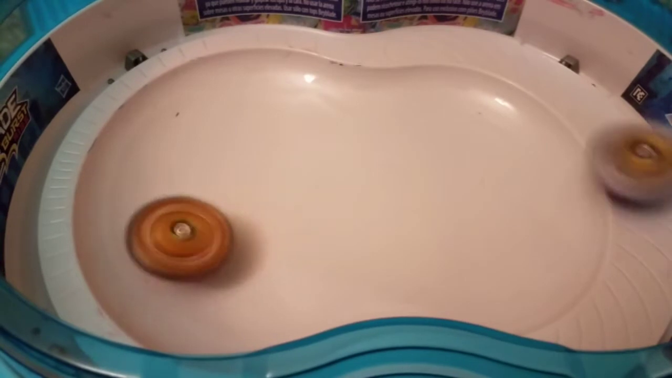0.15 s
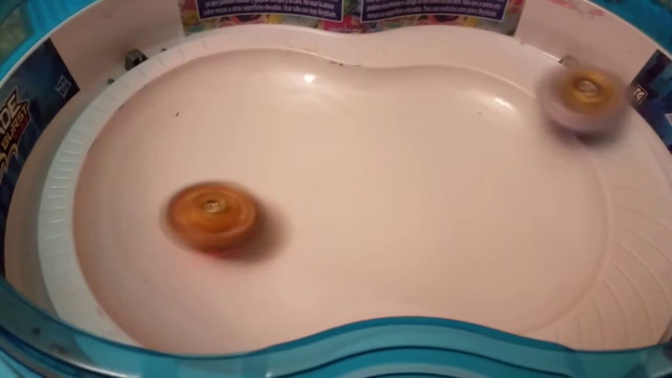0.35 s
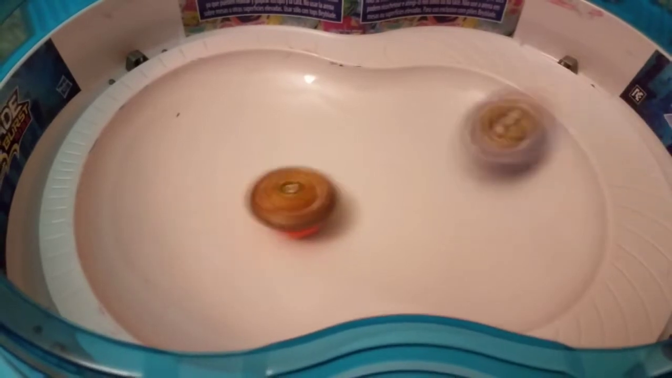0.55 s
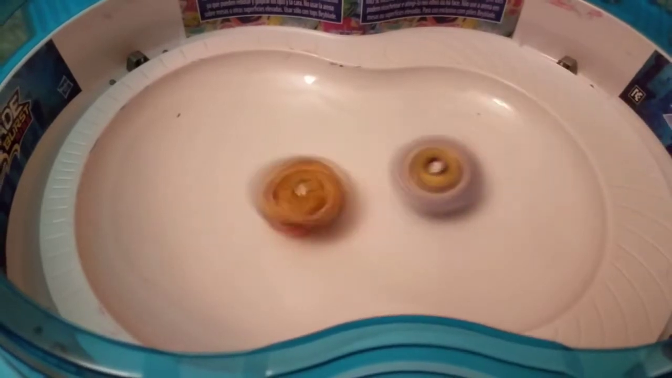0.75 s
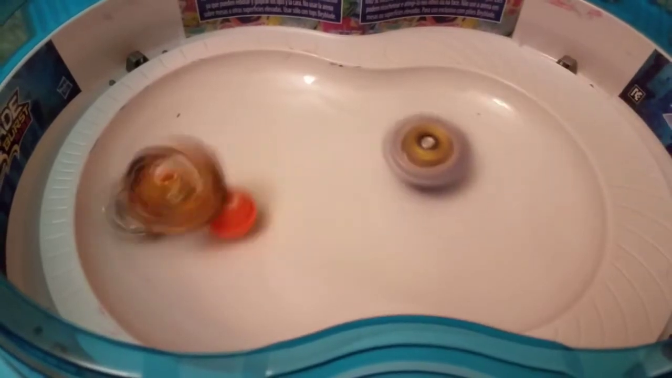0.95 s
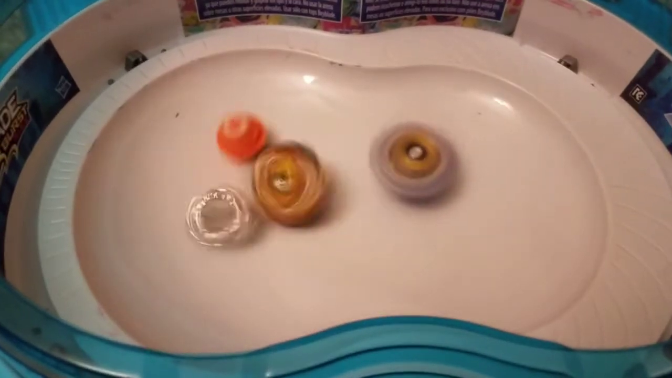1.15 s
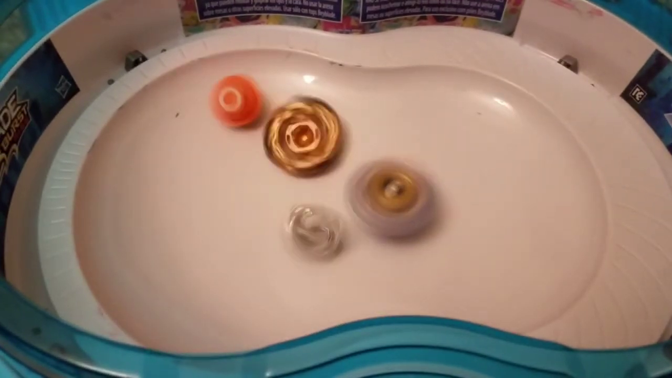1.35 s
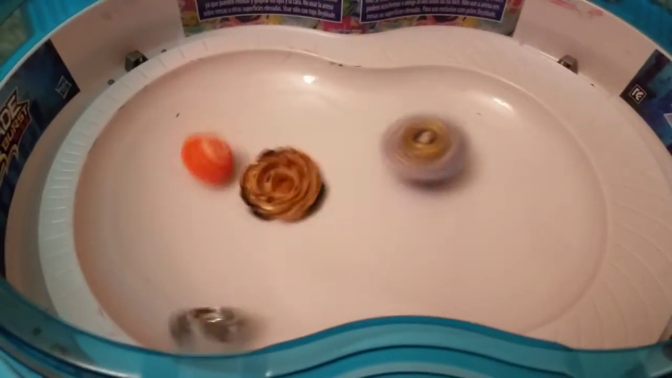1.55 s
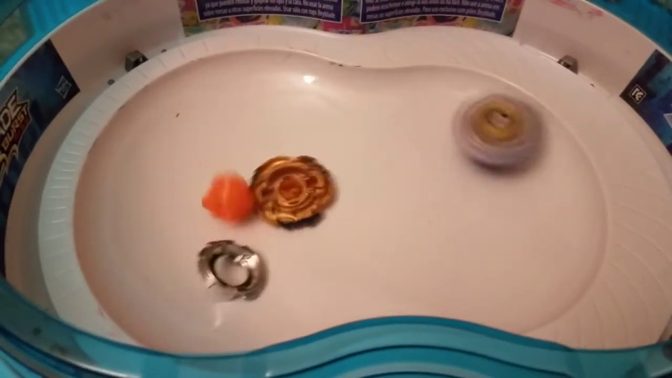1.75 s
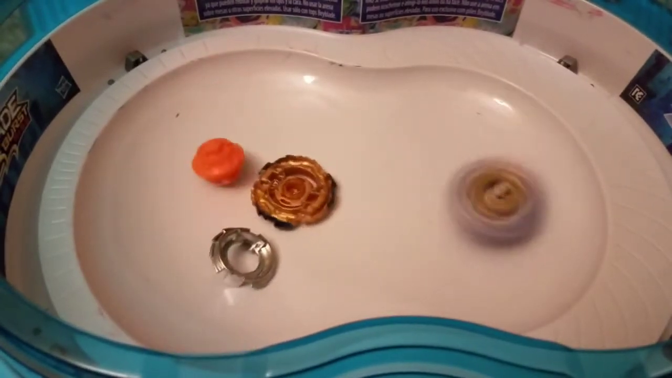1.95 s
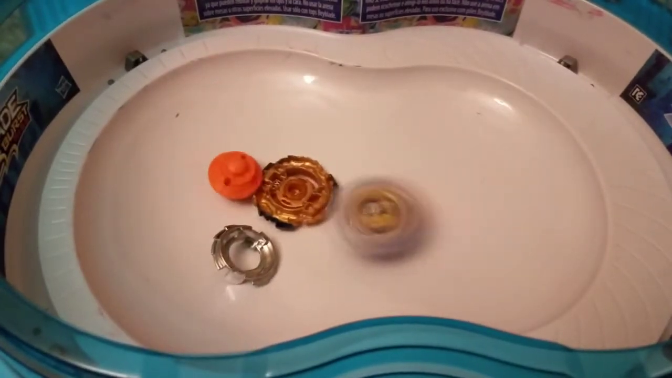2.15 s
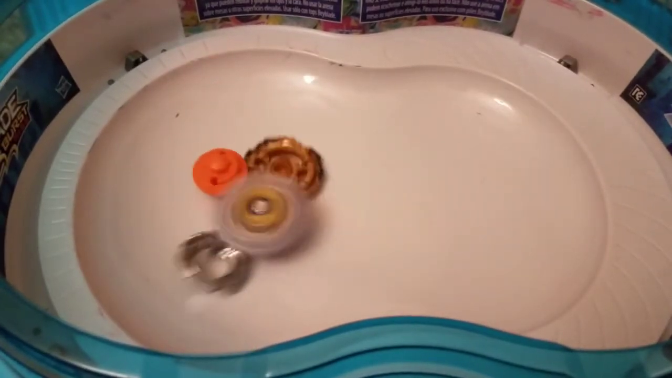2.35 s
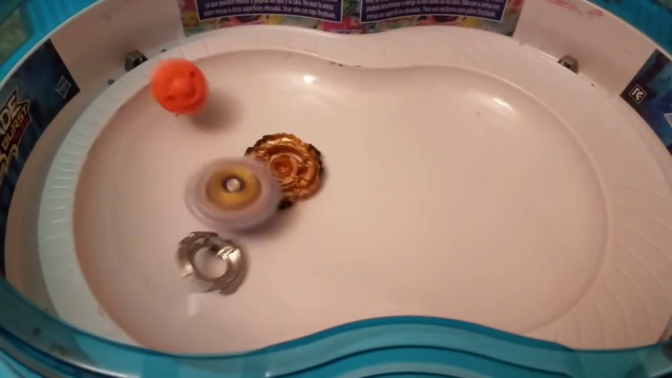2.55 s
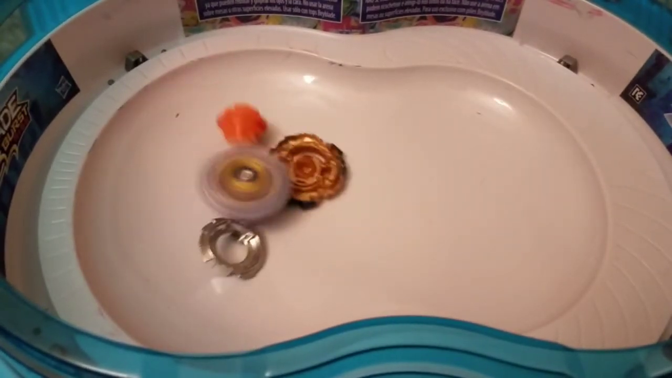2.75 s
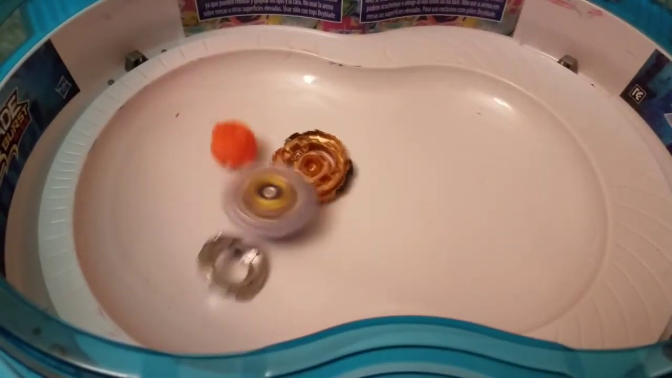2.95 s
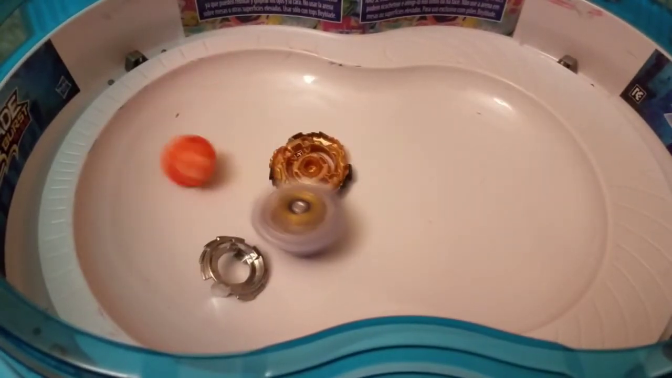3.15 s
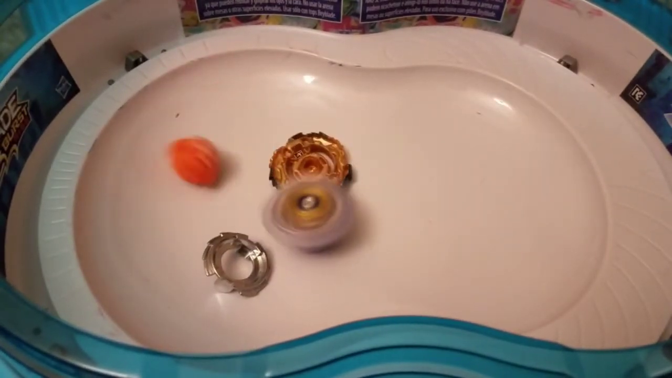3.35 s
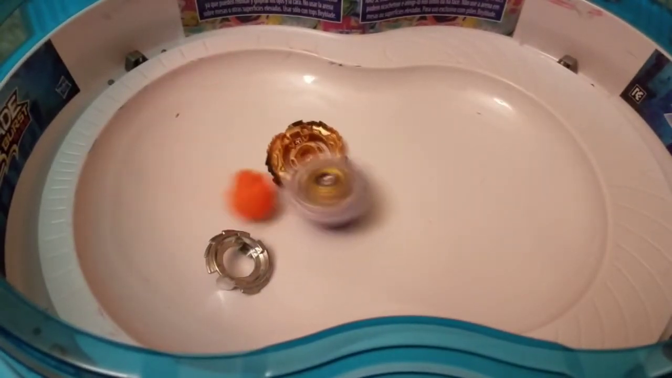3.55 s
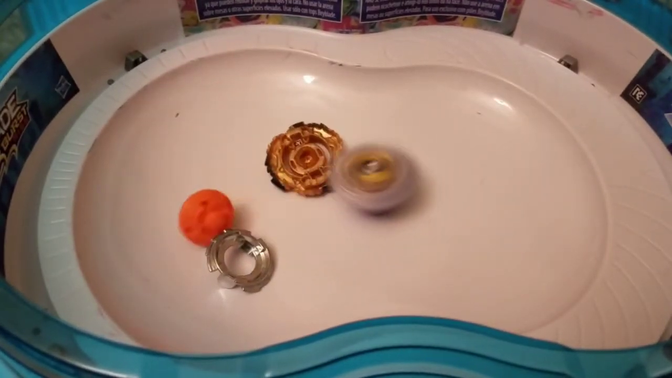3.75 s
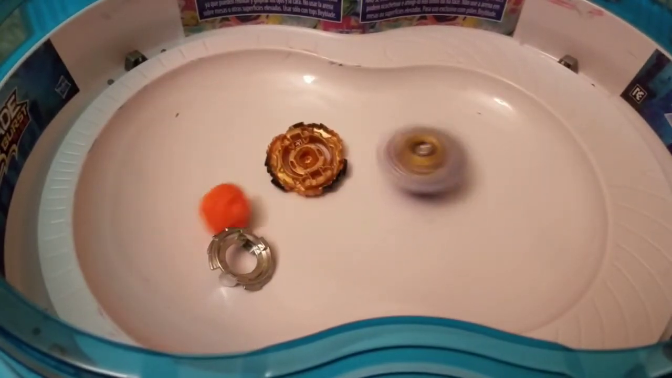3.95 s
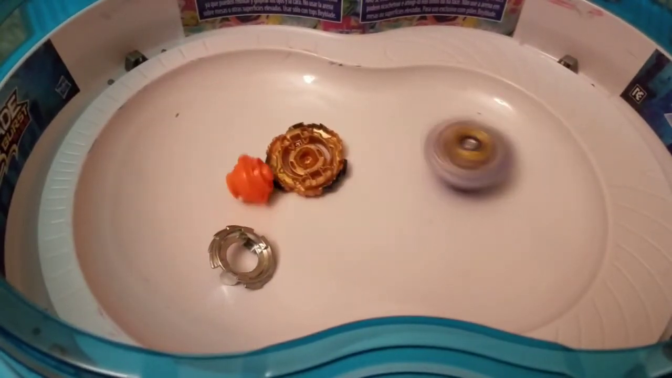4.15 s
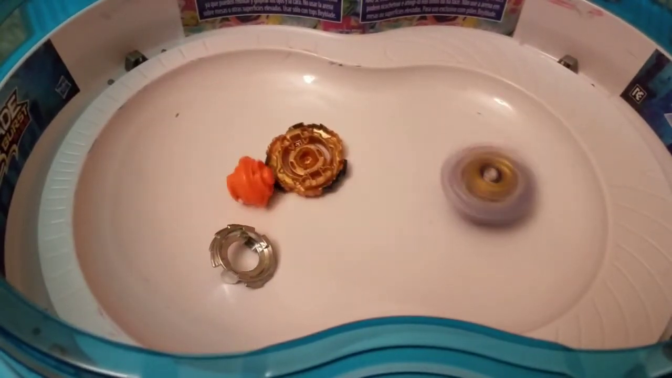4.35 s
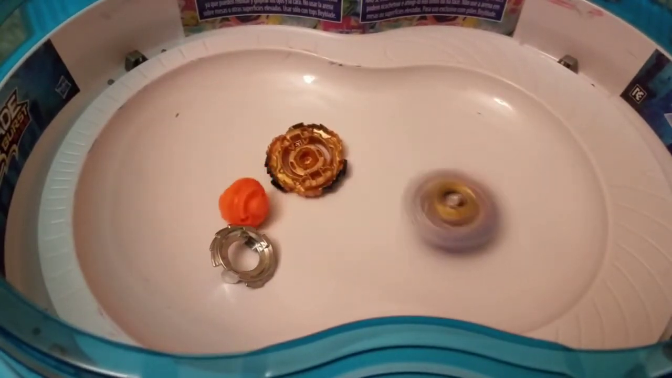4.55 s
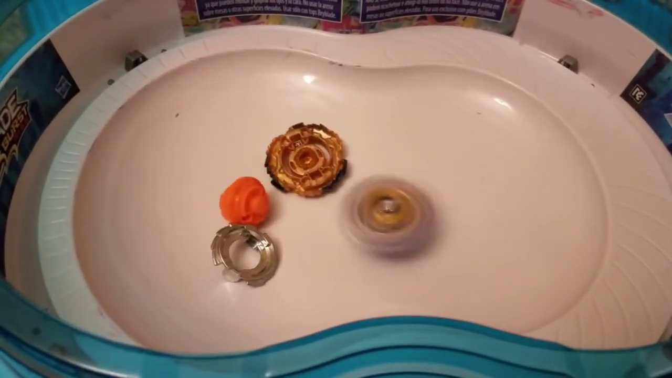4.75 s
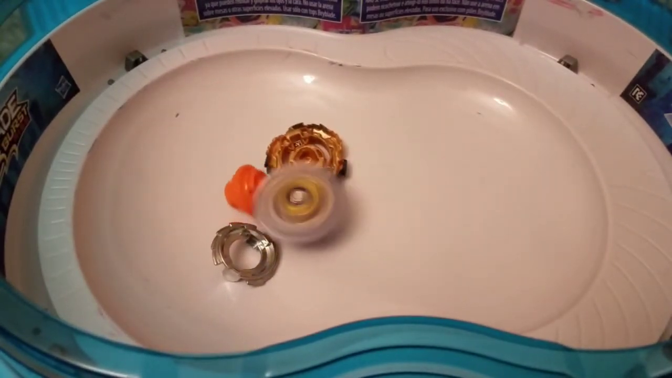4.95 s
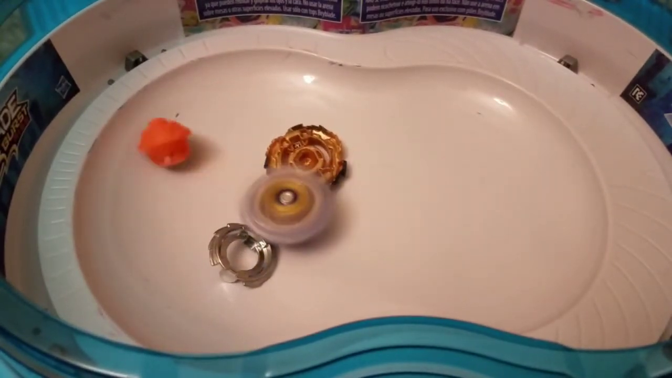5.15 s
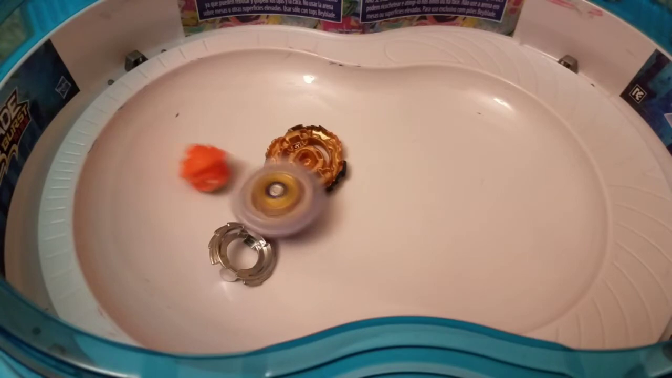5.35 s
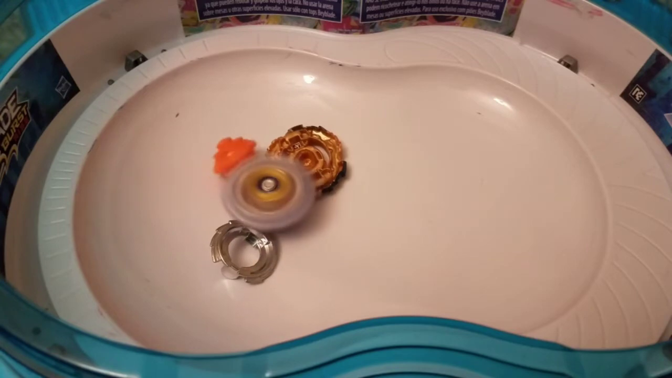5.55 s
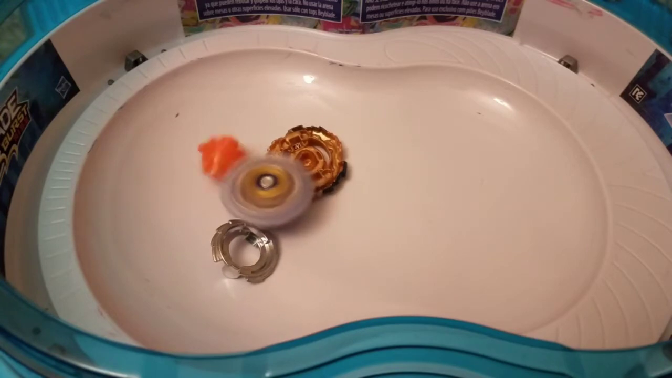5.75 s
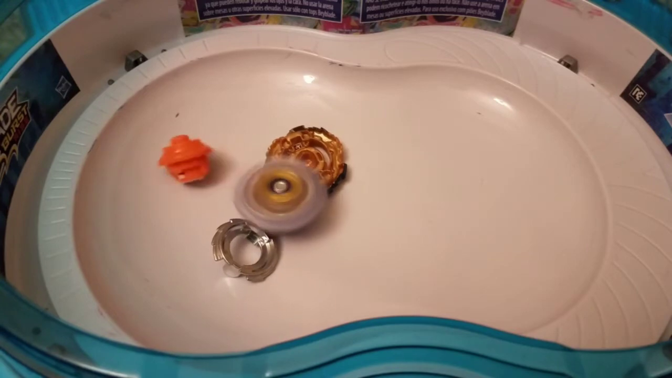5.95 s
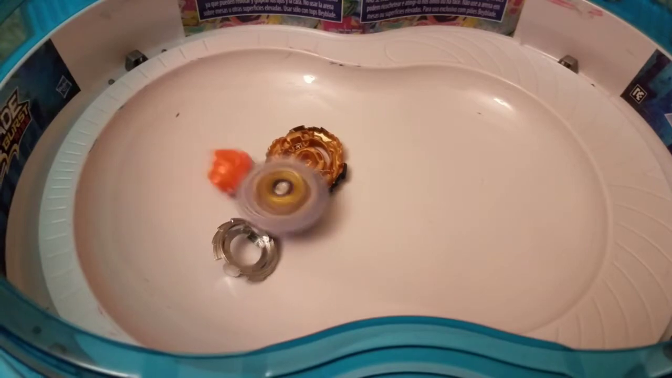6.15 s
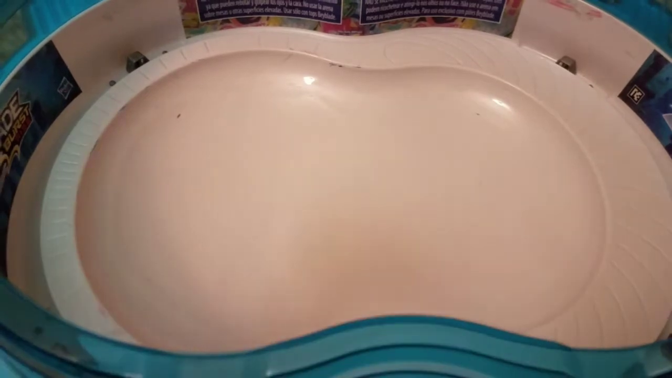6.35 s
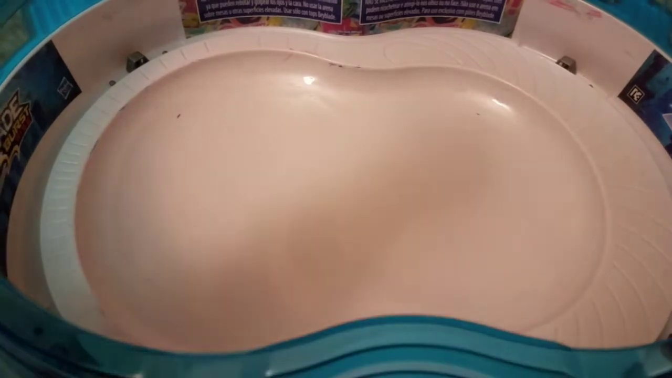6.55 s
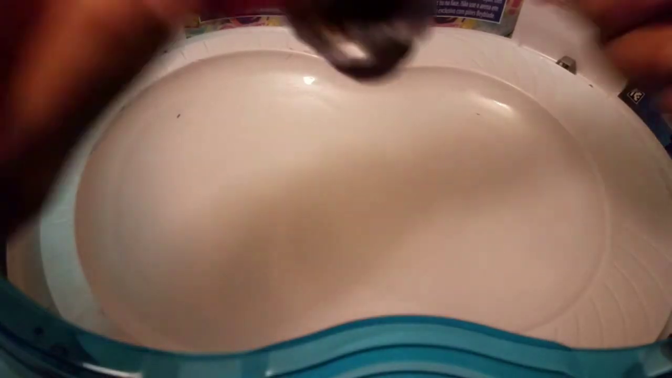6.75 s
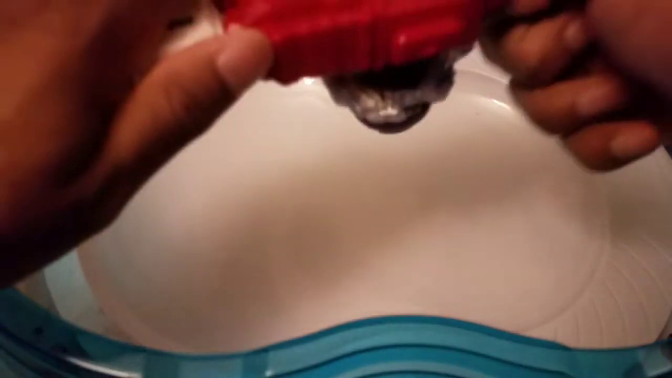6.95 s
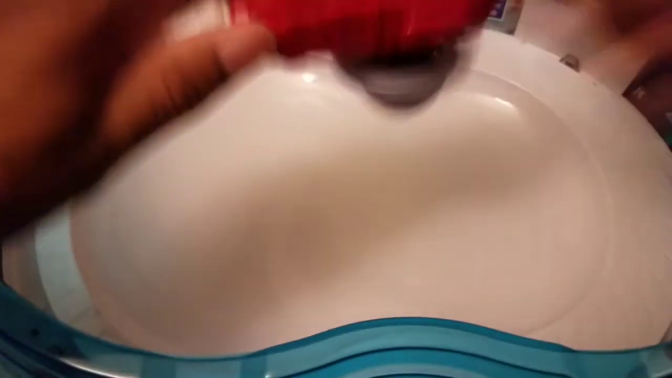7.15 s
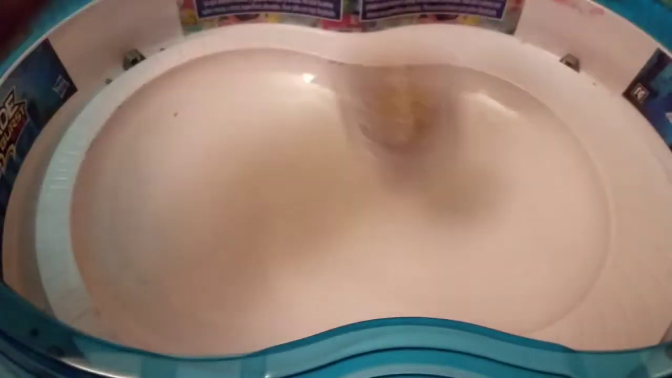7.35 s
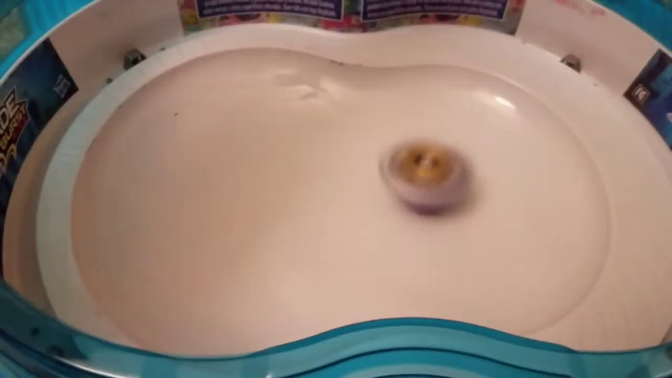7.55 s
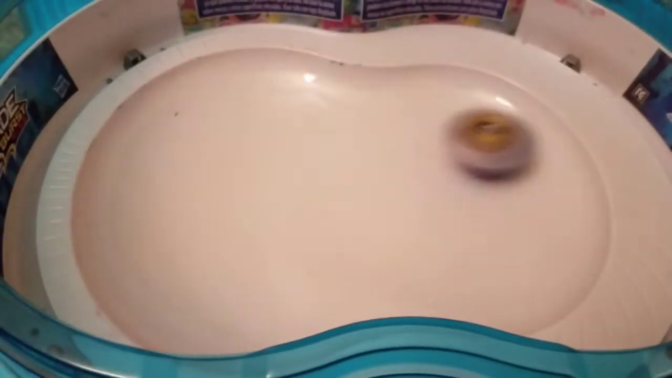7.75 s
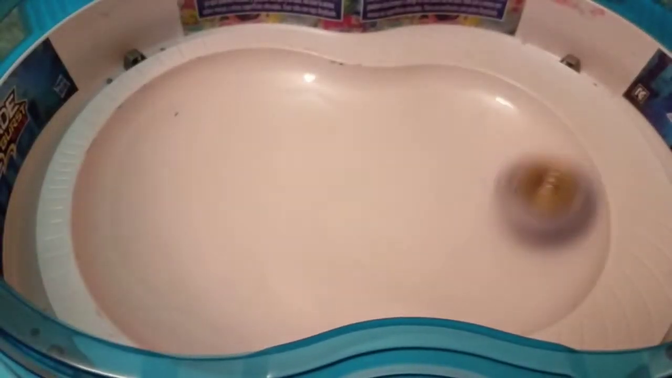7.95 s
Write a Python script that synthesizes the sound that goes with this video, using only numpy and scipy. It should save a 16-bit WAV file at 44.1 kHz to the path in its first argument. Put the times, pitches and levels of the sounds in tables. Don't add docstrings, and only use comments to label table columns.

```python
import sys
import numpy as np
from scipy import signal
from scipy.fft import rfft, irfft, next_fast_len
from scipy.io import wavfile
from scipy.ndimage import uniform_filter1d, map_coordinates

SR = 44100
rng = np.random.default_rng(int(sys.argv[2]) if len(sys.argv) > 2 else 0)


def dump_mix(stems):
    frames = np.atleast_2d(stems).T
    limited = np.clip(frames, -1, 1)
    pcm = np.round(limited * 32767).astype(np.int16)
    wavfile.write(sys.argv[1], SR, pcm)


def to_linear_factor(level_db):
    exponent = np.asarray(level_db, float) / 20
    return 10 ** exponent


N = 357210
CUT, FADE = 6.07, .1

# crest in seconds, peak in dB, pitch of the spot in Hz.
TUMBLE_BLOWS = [(.2442, -24.5, 650), (.2627, -19, 640), (.3096, -12, 440), (.3392, -16, 410),
                (.6937, -5, 470), (.7017, -6.5, 430), (.7134, -9, 483), (.764, -6.5, 470),
                (.832, -9.5, 438), (.911, -3, 438), (.9478, -18, 410), (1.0689, -5, 500),
                (1.0874, -9.5, 600), (1.1386, -8.5, 493), (1.179, -9.5, 480), (1.1986, -14, 450),
                (1.2417, -9, 570), (1.2687, -12.5, 437), (1.3301, -7.5, 463), (1.3424, -12, 560),
                (1.4067, -9, 430), (1.4268, -11.5, 456), (1.5831, -18, 400), (1.6301, -13.5, 393),
                (7.1975, -14.5, 403), (7.2003, -10.5, 470), (7.2095, -24, 380), (7.217, -13.5, 380),
                (7.3455, -31, 415), (7.3602, -23.5, 545)]
# crest in
# seconds, peak in dB.
ATTACK_BLOWS = [(2.0941, -22), (2.1075, -9), (2.137, -19.5), (2.1767, -14), (2.2174, -12), (2.2846, -10),
                (2.2952, -13), (2.3929, -11), (2.4111, -3.5), (2.462, -10.5), (2.4789, -7), (2.5477, -10.5),
                (2.7337, -11.5), (2.7604, -9.5), (2.7843, -10.5), (2.8408, -7.5), (2.8744, -6),
                (2.9209, -9.5), (2.9656, -14), (3.0055, -16.5), (3.2781, -13.5), (3.3265, -12), (3.361, -10),
                (3.4172, -10.5),
                (4.7953, -8.5), (4.814, -9), (4.883, -15), (4.9248, -8.5), (4.949, -14), (4.9868, -15.5),
                (5.006, -9.5), (5.259, -14), (5.274, -13), (5.3185, -12.5), (5.45, -11), (5.4815, -15.5),
                (5.5593, -14), (5.577, -14.5), (5.5974, -11.5), (5.6177, -18.5), (5.636, -9.5),
                (5.9868, -15), (6.0014, -8), (6.023, 0.5)]
# crest in seconds, peak in dB.
BURST_TAPS = [(0.5533, -14.5), (0.5645, -27.5), (0.5852, -26.5), (0.6643, -26.5), (0.6783, -25.5),
              (0.7266, -18.5), (0.7425, -23), (0.7786, -20.5), (0.7888, -23), (0.8043, -26), (0.8475, -23),
              (0.8563, -22.5), (0.9196, -11.5), (0.9269, -16), (0.9403, -23.5), (0.967, -24.5),
              (0.9788, -16.5), (0.988, -17.5), (0.997, -15), (1.0616, -18), (1.098, -19.5), (1.1614, -13),
              (1.2092, -18.5), (1.251, -20), (1.2569, -21.5), (1.2785, -15.5), (1.3207, -17.5),
              (1.3673, -18.5), (1.3854, -22), (1.441, -13), (1.4485, -18), (1.4567, -23.5), (1.463, -23.5),
              (1.472, -22.5), (1.481, -21.5), (1.5338, -15), (1.5496, -25.5), (1.5642, -18.5),
              (1.6023, -24), (1.666, -29), (1.6925, -19)]
LATER_TAPS = [(2.04, -15), (2.0472, -28), (2.062, -28.5), (2.0736, -19.5), (2.116, -21), (2.1237, -20.5),
              (2.145, -10.5), (2.1838, -21), (2.2033, -24), (2.2332, -20), (2.2466, -19), (2.3018, -17),
              (2.309, -14.5), (2.3244, -20.5), (2.352, -20), (2.3674, -15.5), (2.426, -19), (2.4414, -20),
              (2.4869, -19.5), (2.4926, -20.5), (2.5146, -19), (2.5215, -19), (2.5359, -16),
              (2.5798, -13.5), (2.5985, -23), (2.6276, -14.5), (2.643, -13.5), (2.7689, -23), (2.7781, -20),
              (2.7934, -21.5), (2.8068, -15.5), (2.822, -23.5), (2.883, -25), (2.889, -23), (2.8973, -14),
              (2.9287, -25.5), (2.9846, -13), (3.0213, -17), (3.06, -25), (3.1462, -27), (3.1653, -28),
              (3.1996, -13.5), (3.2205, -20.5), (3.247, -23.5), (3.2871, -14), (3.306, -29), (3.3718, -21),
              (3.4888, -14.5), (3.5113, -18), (3.5294, -20.5), (3.55, -24),
              (3.74, -18.5), (3.7547, -20), (3.774, -24), (3.8715, -22), (3.8941, -21), (4.2043, -24.5),
             (4.225, -23), (4.8056, -18.5), (4.83, -21.0), (4.8346, -18), (4.8424, -15.5), (4.8633, -17.5),
             (4.8956, -21), (4.907, -21), (4.963, -21), (4.974, -23), (5.0255, -15.5), (5.0377, -27),
             (5.079, -23.5), (5.2965, -16), (5.3045, -21), (5.3386, -16.5), (5.3535, -27), (5.3671, -16.5),
             (5.3858, -21), (5.4034, -23), (5.4153, -20.5), (5.5028, -19), (5.52, -20.5), (5.5878, -15),
             (5.659, -26), (5.6696, -20), (5.6937, -25), (5.9559, -18), (5.976, -25), (6.035, -30),
             (6.0483, -17), (7.5031, -27.0), (7.5144, -26), (7.5448, -23), (7.5768, -25.5), (7.5863, -22.5),
             (7.5964, -23.5), (7.615, -28), (7.6283, -24), (7.6486, -21.5), (7.6591, -23.5), (7.6907, -26),
             (7.713, -25.5), (7.7222, -24), (7.7455, -22.5), (7.7549, -25), (7.772, -27),
              (1.844, -29), (1.867, -34), (3.136, -32), (3.723, -26.5), (3.837, -27), (4.266, -28.5),
              (4.324, -26.5), (4.735, -34), (5.753, -25), (7.682, -23), (7.815, -31), (7.968, -35.5),
              (8.051, -27.5), (8.058, -33)]
MIDDLE_HZ, TAP_HZ = 419, 383
LIGHT_HZ = 244
# centre in Hz, width in Hz, level in dB.
BOWL_MODES = [(76.4, 27, -2), (131, 71, 1.5), (231.6, 35, 3), (329, 96, -2.5), (383.3, 62, -1.5),
              (470, 64, -10), (560, 110, -7), (623, 40, -8.5), (641.4, 9, -1.5), (860, 110, -14.5)]
# centre in Hz, width in Hz, level in dB.
SHELL_MODES = [(970, 735, -2.5), (1290, 490, 5), (1501, 408, 3), (2096, 270, -3), (2890, 690, -8)]

# start in seconds, level in dB.
TOP_DROPS = [
    (0.239, -43),
    (7.06, -37),
    (7.196, -25),
    (7.344, -34),
]
# centre in Hz, width in Hz, level in dB.
FLOOR_MODES = [(384, 14, 2.5), (438, 34, -1), (702, 140, 1)]

# start in seconds, peak in dB,
# plastic shell over the crack in dB.
RIM_CLASHES = [(.3082, -18, -0.5), (.4988, -4.5, -20), (.556, -15, -18), (.676, -15, -19.5),
               (.7117, -9, -12), (.9104, -21.5, -2.5), (.9598, -14, -13), (1.0101, -12, -10),
               (1.067, -14.5, -1), (1.0815, -13, -17.5), (1.1622, -2.5, -15.5), (1.2113, -2.5, -15),
               (1.3274, -25.5, 13.5), (1.4168, -20, -17), (1.5301, -17, -3), (1.5603, -19, -8),
               (1.6277, -38, 12), (1.6886, -38.5, 9), (1.8407, -35, 8),
               (2.036, -18.5, -2), (2.1067, -13.5, -5.5), (2.174, -16, -3.5), (2.2139, -6, -6.5),
                 (2.283, -22, 9.5), (2.391, -27, -2.5), (2.4084, -21, -5), (2.4592, -27.5, 6),
                 (2.5003, -12, -7), (2.5288, -8, -10), (2.6262, -16.5, -7), (2.7305, -26, 1),
                 (2.7595, -10, -14), (2.872, -4, -11.5), (2.9816, -25.5, -10), (3.1982, -28, -3),
                 (3.274, -23.5, -1), (3.3598, -8, -8),
               (3.7389, -41, 14.5), (3.87, -41.5, 8), (4.2022, -45, 10), (4.3192, -43, 11),
                  (4.795, -4, -30), (4.917, -26.5, -8), (5.003, -21.5, -5), (5.2592, -15.5, -2),
                  (5.3165, -15.5, -3), (5.3646, -32.5, 12), (5.414, -23, -4), (5.4436, -13.5, -6.5),
                  (5.481, -23.5, -2), (5.5577, -10.5, -14.5), (5.609, -19.5, 1.5), (5.748, -29.5, -7),
                  (5.9198, -52, 11.5), (5.954, -30, -7.5), (5.987, -7, -13), (6.0199, -1.5, -5.5)]
# start in seconds, peak in dB.
GRAZES = [(0.501, -21), (3.277, -20), (2.393, -23), (0.5479, -13), (0.8447, -23.5), (0.8593, -24),
          (2.1473, -17), (2.5383, -18.5), (3.2534, -29), (3.416, -24.5), (4.811, -5.5), (4.8387, -18),
          (7.207, -19), (0.345, -25), (0.376, -28.5), (.514, -14.5), (0.662, -26), (1.132, -25),
          (1.278, -27.5), (1.941, -36.5), (2.096, -30), (2.486, -20.5), (3.309, -27), (4.883, -21.5),
          (5.025, -37), (5.657, -26.5)]
# start in seconds, peak in dB, plastic in dB.
HANDLING_CLICKS = [
    (7.198, -25, 14.5),
    (7.3284, -14, -13.5),
    (7.3719, -17.5, -23),
    (7.4195, -3, -9.5),
    (7.5175, -7.5, -8),
    (7.5674, -11.5, -7),
]
# start in seconds, peak in dB, plastic in dB.
FITTING_CLICKS = [
    (6.2225, -30, -2.5),
    (6.3077, -29, -5.5),
    (6.6518, -49, 1.5),
    (6.6962, -39, 0),
    (6.7978, -56, 8),
]
# frequency in Hz, level in dB per Hz.
CRACK_TONE = [(1180, -36), (2000, -6), (3200, -4.5), (3680, 2), (10400, -8), (12400, -7), (14400, -8),
              (16000, -6.5)]

# start in seconds, level in dB.
LOOSE_RING_HITS = [
    (.56, -40),
    (.711, -25),
    (.963, -30.5),
    (1.211, -36),
    (1.417, -51),
    (1.53, -49),
]
# start in seconds, level in dB.
HELD_RING_HITS = [(.499, -17), (1.164, -25.5), (1.211, -20.5), (2.14, -42), (2.174, -31), (2.213, -41),
                  (2.5, -30.5), (2.624, -35), (2.872, -33), (3.358, -41.5), (4.795, -21.5), (5.414, -36.5),
                  (5.478, -38), (5.558, -19), (5.986, -35)]
# start in seconds, level in dB.
RESTING_RING_HITS = [
    (1.9, -50.5),
    (3.358, -47.5),
    (5.75, -62),
    (5.558, -35.5),
]
# start in seconds, level in dB.
LAYER_SLAPS = [
    (.309, -20.5),
    (1.329, -17.5),
    (2.392, -28.5),
]
# start in seconds, level in dB.
DISC_WHACKS = [
    (2.283, -11.5),
    (3.277, -21.5),
]
# start in seconds, level in dB.
CASE_KNOCKS = [
    (6.685, -55),
    (6.6962, -33),
    (6.728, -59),
    (6.7494, -47),
    (6.7978, -55.5),
]
# frequency in Hz, level in dB, t60 in seconds.
LOOSE_RING = [(4818, -17, .4), (6503, -16, .55), (8915, -6, .55), (11530, -4, .4), (12880, -5, .22),
              (14140, -16, .2)]
HELD_RING = [(6013, -14, .06), (8468, -12, .13), (9803, -10, .12), (12670, 0, .11), (14030, -3, .08)]
RESTING_RING = [(4554, -3, .5), (4613, -7, .9), (8829, 3, .3)]
LAYER_PARTIALS = [(830, 13, 0.0078), (1220, -3.5, 0.13), (1370, -18.5, 0.037)]
DISC_PARTIALS = [(778, 0.5, .07), (2043, -6.5, .04)]
CASE_PARTIALS = [(1303, -4, 0.034), (1854, -9, 0.027), (2120, -13, 0.024), (3200, -10.5, 0.013)]

# time in seconds, level in dB.
FREE_ROLL = [(0, -38.5), (.15, -49.5), (.45, -35.5), (1.2, -33.5), (1.78, -45), (3, -48), (4.05, -50.5),
             (4.3, -54), (4.55, -46), (6.06, -44), (6.1, -63), (6.9, -72), (7.3, -41), (7.68, -38),
             (7.84, -42.5), (7.95, -35.5), (8.01, -44.5), (8.1, -50)]
# start in seconds, length in seconds, level in dB.
BOUTS = [(0.534, 0.008, -15), (0.66, 0.01, -21.5), (0.717, 0.26, -31.5), (0.91, 0.087, -22.5),
         (1.064, 0.15, -21.5), (1.185, 0.33, -15), (1.51, 0.14, -16.5), (1.855, 0.26, -18),
         (2.034, 0.19, -11), (2.299, 0.2, -11), (2.525, 0.16, -11), (2.771, 0.26, -18.5),
         (3.135, 0.015, -23), (3.221, 0.2, -13), (3.482, 0.016, -16), (3.636, 0.0055, -24.5),
         (3.726, 0.083, -23), (3.862, 0.028, -25.5), (4.192, 0.041, -25), (4.326, 0.0083, -37.5),
         (4.799, 0.35, -21.5), (5.298, 0.17, -15.5), (5.5003, 0.17, -20.5), (5.77, 0.054, -29),
         (5.953, 0.038, -13.5), (7.51, 0.15, -44), (7.875, 0.089, -34), (8.05, 0.0094, -26)]
GRIND_DB, SETTLE_S = -13, 0.33
SCRAPE_DB, NEW_TIP_DB = -19.5, 11.5
RATTLE_DB = -30.5
NOD_HZ, NOD_S, NOD_DB = 17, 4.557, 5
# frequency in Hz, level in dB per Hz.
SCRAPE_TONE = [(410, -29.5), (700, -7.5), (1150, -7), (1770, -13.5), (4380, -21), (9110, -34.5),
               (14600, -34.5), (16000, -28.5)]
# time in seconds, level in dB.
WALL_CLIMB = [
    (7.84, -100),
    (7.9, -42),
    (7.96, -45),
    (8.04, -100),
]
# centre in Hz, width in Hz, level in dB.
WALL_MODES = [(830, 120, 1.5), (1400, 250, -4.5)]
LEDGE_MODES = [(430, 50, 1), (560, 25, 1.5)]
TIP_MODES = [(240, 35, -1), (378, 25, 2.5), (477, 42, -6), (604, 78, -4.5), (830, 20, -11),
             (1000, 35, -15.5)]

# time in seconds, level in dB, brightness in dB.
CORD_PULL = [
    (6.917, -49, -9),
    (6.932, -24, -6),
    (6.942, -26, -9.5),
    (6.965, -15.5, -6),
    (6.982, -10, -6.5),
    (7.005, -12, -5),
    (7.033, -14, -1),
    (7.085, -20.5, -6.5),
    (7.14, -39.5, -6),
]
# time in seconds, level in dB, brightness in dB.
FREEWHEEL = [
    (7.14, -42, -10),
    (7.2, -30.5, -9.5),
    (7.243, -31, -7),
    (7.262, -30.5, -7),
    (7.33, -23, -10),
    (7.365, -35, -13),
    (7.382, -27, -9),
    (7.41, -42, -1),
    (7.499, -37, -8),
]
# time in seconds, tooth rate in Hz, level over the rattle in dB.
GEAR_WHINE = [
    (6.94, 1447, -22),
    (6.965, 1457, -6),
    (6.99, 1279, -13),
    (7.04, 1935, -4.5),
    (7.06, 2010, -40),
]
# time in seconds, level over the rattle in dB.
TOOTH_JOLTS = [
    (6.933, 13),
    (6.964, 17.5),
    (6.981, 19),
    (6.984, 16),
    (6.9898, 17),
    (6.998, 18),
    (7.0195, 24),
    (7.0334, 13),
    (7.062, 26),
]
# centre in Hz, width in Hz, level in dB.
LAUNCHER_MODES = [(1160, 630, 4.5), (1400, 910, -3.5), (2795, 700, -2), (3320, 210, -3), (3995, 330, -5.5),
                  (5790, 1300, -10.5)]
# frequency in Hz, left-right likeness.
GRIP_ALIKE = [(300, .15), (640, 0.95), (1400, 0.93), (2800, 0.12), (13000, .1)]

# frequency in Hz, t60 in seconds.
ROOM_DECAY = [(150, 0.53), (600, 0.12), (2500, 0.29), (8000, 0.25), (15000, 0.08)]
# frequency in Hz, level in dB.
ROOM_LEVEL = [(150, -12.5), (600, -7), (2500, -5), (8000, -8.5), (15000, -12)]
# frequency in Hz, left-right likeness.
SCATTER_ALIKE = [(200, 0.88), (700, 0.14), (1500, 0.038), (2500, 0.016), (8000, 0.013), (13000, 0.66)]
# frequency in Hz, left minus right in dB.
PORT_BALANCE = [(100, -3.5), (350, -1.5), (700, -3), (1400, -1.5), (10000, -0.5)]
LAG = -3 / SR
SCENE_PAN_DB = 1.5

# frequency in Hz, level in dB per Hz.
AIR_TONE = [(24, -58), (40, -27.5), (86, -9.5), (124, -5), (209, -22), (310, -23), (7270, -44.5),
            (14500, -43.5)]
AIR_DB = -68
# time in seconds, level in dB.
MAINS_HUM = [
    (0, -66),
    (1.8, -46),
    (5.2, -46.5),
    (6.15, -50),
    (6.6, -63),
    (7.15, -64.5),
    (8.1, -50.5),
]


def unit(x):
    return x / np.sqrt(np.mean(x ** 2) + 1e-20)


def along(points, hz):
    f, v = np.transpose(points)
    return np.interp(np.log(hz + 1), np.log(f + 1), v)


def curves(rows):
    s, *columns = np.transpose(rows)
    return [np.interp(np.arange(N) / SR, s, column) for column in columns]


def wobble(rate, size=N):
    knots = rng.standard_normal(int(size * rate / SR) + 4)
    return map_coordinates(knots, [np.arange(size) * rate / SR])


def lumps(shape, width):
    return unit(uniform_filter1d(rng.standard_normal(shape), width))


def filtered(x, response):
    size = next_fast_len(x.shape[-1] + SR // 4)
    spectrum = rfft(x, size) * response(np.fft.rfftfreq(size, 1 / SR))
    return irfft(spectrum, size)[..., :x.shape[-1]]


def above(corner_hz):
    return lambda hz: (1j * hz / (corner_hz + 1j * hz)) ** 2


def body(modes):
    def response(f):
        total = 0
        for k, (centre, width, db) in enumerate(modes):
            damping = 1j * f * abs(width)
            total = total + (-1) ** k * to_linear_factor(db) * damping / (centre * centre - f * f + damping)
        return total
    return response


def placed(times, rows):
    at = np.round(times * SR).astype(int)[:, None] + np.arange(rows.shape[-1])
    return np.bincount(at.ravel(), rows.ravel(), N + SR)[:N]


def grains(per_s, spread_db):
    struck = rng.random(N) < per_s / SR
    size = struck * to_linear_factor(spread_db * np.minimum(rng.exponential(size=N), 4))
    return unit(size * rng.standard_normal((2, N)))


def diffuse(pair, alike=SCATTER_ALIKE):
    def spread(hz):
        turn = np.arccos(np.clip(along(alike, hz), -1, 1)) / 2
        return np.array([np.cos(turn), np.sin(turn)])
    mid, side = filtered(pair, spread)
    return np.array([mid + side, mid - side])


def thumps():
    def spot(rows, hz):
        return np.c_[rows, hz * np.exp(.08 * rng.standard_normal(len(rows)))]

    blows = np.r_[TUMBLE_BLOWS, spot(BURST_TAPS, TAP_HZ), spot(ATTACK_BLOWS, MIDDLE_HZ),
                  spot(LATER_TAPS, TAP_HZ)]
    s, db, hz = np.transpose(blows)[:, :, None]
    t = np.arange(SR // 30) / SR
    u = t * hz / np.where(s > 7.4, 1, 0.75)
    dent = -to_linear_factor(db) * u ** 2 * np.exp(2 - 2 * u) * np.sin(2 * np.pi * hz * t)
    push = to_linear_factor(db + 16.5) * np.exp(-t / 0.00012) * rng.uniform(-1.48, 1.38, s.shape)
    edge = to_linear_factor(db - 5.5 - 60 * t / 0.033) * rng.standard_normal(u.shape)
    light = len(TUMBLE_BLOWS + BURST_TAPS)
    pushes = filtered(placed(s[:light, 0], push[:light]), above(LIGHT_HZ))
    pushes = pushes + placed(s[light:, 0], push[light:])
    touch = (s - 0.8 / hz)[:, 0]
    shell = filtered(placed(s[:, 0] - .001, edge), body(SHELL_MODES))
    return placed(touch, dent) + filtered(pushes, body(BOWL_MODES)) + shell


def drops():
    s, db = np.transpose(TOP_DROPS)[:, :, None]
    t = np.arange(SR // 8) / SR
    shake = placed(s[:, 0], to_linear_factor(db + 30.0 - 60 * t / 0.037) * rng.standard_normal((len(s), len(t))))
    table = placed(s[:, 0], to_linear_factor(db - 5.5 - 60 * t / 0.23) * np.sin(2 * np.pi * 62 * t))
    bowl = filtered(filtered(shake, above(LIGHT_HZ)), body(BOWL_MODES))
    return bowl + to_linear_factor(0.5) * filtered(shake, body(FLOOR_MODES)) + table


def clashes(rows, rattle_db):
    s, db, plastic_db = np.transpose(rows)[:, :, None]
    t = np.arange(SR // 9) / SR
    rattle = to_linear_factor(rattle_db - 60 * t / 0.12 + 2.3 * lumps((len(s), len(t)), width=120))
    burst = (to_linear_factor(-60 * t / 0.0089) + rattle) * (1 - np.exp(-t / 0.00072))
    graze = 200
    burst[:, -graze:] = to_linear_factor(np.linspace(-34, -14, graze))
    burst = np.roll(burst, graze, axis=1)
    s = s - graze / SR

    def blows(level_db):
        noise = rng.standard_normal((2, len(s), len(t)))
        return np.array([placed(s[:, 0], row) for row in to_linear_factor(level_db) * burst * noise])

    crack = filtered(blows(db + 4.0), lambda hz: to_linear_factor(along(CRACK_TONE, hz)))
    return diffuse(crack + filtered(blows(db + plastic_db + 17.0), body(SHELL_MODES)))


def struck(hits, partials):
    s, db = np.transpose(hits)[:, :, None]
    t = np.arange(round(.4 * SR)) / SR
    rocking = to_linear_factor(db + 3 * lumps((len(s), len(t)), width=250))
    waver = .15 * lumps(rocking.shape, width=300)
    ring = 0
    for hz, level, t60 in partials:
        strength = to_linear_factor(level - 60 * t / t60) * to_linear_factor(rng.normal(0, 2, (2, *s.shape)))
        beat = 1 + .3 * np.cos(2 * np.pi * 30 * rng.random(s.shape) * t)
        phase = hz * t + rng.random((2, *s.shape)) + waver
        ring = ring + strength * beat * np.sin(2 * np.pi * phase)
    return np.array([placed(s[:, 0], rocking * side) for side in ring])


def grinding():
    s, length, db = np.transpose(BOUTS)[:, :, None]
    t = np.arange(0, N / SR, .002)
    sounding = (t > s) * ((t < CUT) | (s > CUT))
    fall_db = 60 * np.clip(t - s - length, 0, 1) / SETTLE_S
    power = sounding * to_linear_factor(2 * (db + GRIND_DB - fall_db))
    return np.interp(np.arange(N) / SR, t, power.sum(axis=0))


def rolling():
    t = np.arange(N) / SR
    free = to_linear_factor(2 * curves(FREE_ROLL)[0])
    bouts = grinding()
    new_top = t > CUT
    light = (abs(t - .97) < .33) | new_top
    throb = to_linear_factor(2.5 * wobble(45))

    def dull(hz):
        return hz / (hz + 400) / (1 + (hz / 900) ** 4)

    soft = filtered(grains(per_s=630, spread_db=4.5)[0] + 0.5 * rng.standard_normal(N), dull)
    smooth = unit(soft) + 2 * unit(filtered(rng.standard_normal(N), dull))
    nodding = abs(t - NOD_S) < .3
    nod = np.sqrt(throb) * to_linear_factor(NOD_DB * nodding * np.cos(2 * np.pi * NOD_HZ * (t - NOD_S)))

    on_ledge = t < TOP_DROPS[0][0]
    tip = np.where(on_ledge, filtered(smooth, body(LEDGE_MODES)), filtered(smooth, body(TIP_MODES)))
    chatter = np.sqrt(bouts * ~light) * unit(throb * filtered(soft, body(BOWL_MODES)))
    chatter = chatter + np.sqrt(free + bouts * light) * unit(nod * tip)
    chatter = chatter + to_linear_factor(curves(WALL_CLIMB)[0]) * unit(throb * filtered(smooth, body(WALL_MODES)))

    scrape = filtered(grains(per_s=3400, spread_db=-3.5), lambda hz: to_linear_factor(along(SCRAPE_TONE, hz)) * (hz > 600))
    scrape_db = 10 * np.log10(free + bouts) + SCRAPE_DB + NEW_TIP_DB * new_top
    rattle = unit(filtered(grains(per_s=210, spread_db=18.0),
                           lambda hz: to_linear_factor(along(CRACK_TONE, hz)) + np.abs(body(SHELL_MODES)(hz))))
    out = to_linear_factor(-5.0) * chatter + to_linear_factor(scrape_db + 3.5) * unit(throb * diffuse(scrape))
    return out + to_linear_factor(RATTLE_DB) * np.sqrt(bouts) * diffuse(rattle)


def cord():
    pull = slice(round(CORD_PULL[0][0] * SR), round(FREEWHEEL[-1][0] * SR))
    db, bright_db = curves(CORD_PULL + FREEWHEEL[1:])
    teeth = grains(per_s=1500, spread_db=1.4) + .55 * rng.standard_normal((2, N))
    for s, jolt_db in TOOTH_JOLTS:
        teeth[:, round(s * SR)] = to_linear_factor(jolt_db)
    teeth = filtered(filtered(teeth[:, pull], above(corner_hz=830)), above(corner_hz=830))

    tooth_hz, whine_db = curves(GEAR_WHINE)
    cycles = np.cumsum(tooth_hz) / SR + .12 * wobble(250)
    whine = to_linear_factor(whine_db + 3 * wobble(150)) * np.sin(2 * np.pi * cycles)

    case = 0
    for mode in LAUNCHER_MODES:
        case = case + to_linear_factor(2 * wobble(29.8, size=teeth.shape[1])) * filtered(teeth, body([mode]))
    case = unit(case)
    hollow = filtered(case, lambda hz: 1 - 0.45 * np.exp(-((hz - 2050) / 450) ** 2))
    freed = np.arange(N)[pull] > TOP_DROPS[2][0] * SR
    case = np.where(freed, hollow, case)

    hiss = unit(filtered(teeth, above(corner_hz=4140)))
    rattle = diffuse(case + to_linear_factor(bright_db[pull] + 3.5) * hiss, GRIP_ALIKE)
    out = np.zeros((2, N))
    out[:, pull] = to_linear_factor(db + 0.5 + 0.84 * wobble(200))[pull] * (whine[pull] + rattle)
    return out


def room(x):
    out, step = np.zeros((2, N + SR)), SR // 4
    for a in range(0, N, step):
        hz, t, z = signal.stft(rng.standard_normal((2, SR // 2)), SR, nperseg=256)
        shape = to_linear_factor(-60 * t / along(ROOM_DECAY, hz)[:, None])
        shape /= np.linalg.norm(shape, axis=1, keepdims=True) * np.sqrt(128)
        shape *= to_linear_factor(along(ROOM_LEVEL, hz))[:, None]
        tail = signal.istft(z * shape, SR, nperseg=256)[1]
        answer = signal.fftconvolve(x[None, a:a + step], tail, axes=1)
        seconds = (a + np.arange(answer.shape[1])) / SR
        answer *= np.clip((CUT - seconds) / 0.026, a / SR > CUT, 1)
        out[:, a + 150:a + 150 + answer.shape[1]] += answer
    return diffuse(out[:, :N])


def background():
    t = np.arange(N) / SR
    air = unit(filtered(rng.standard_normal((2, N)), lambda hz: to_linear_factor(along(AIR_TONE, hz)) * (hz > 200)))
    low = unit(filtered(rng.standard_normal((2, N)), lambda hz: to_linear_factor(along(AIR_TONE, hz)) * (hz <= 200)))
    hum = np.sqrt(2) * np.sin(2 * np.pi * 119.5 * t + 0.5 * wobble(12.0)) + to_linear_factor(-3.5) * diffuse(low)
    return to_linear_factor(AIR_DB) * diffuse(air) + to_linear_factor(curves(MAINS_HUM)[0] - 1.5) * hum


def scene():
    t = np.arange(N) / SR
    grazes = [(s, db, -3) for s, db in GRAZES]
    rims = clashes(RIM_CLASHES + grazes, rattle_db=-17.0)
    rims = rims + clashes(HANDLING_CLICKS, rattle_db=-18.5) + clashes(FITTING_CLICKS, rattle_db=-25.5)
    rings = struck(LOOSE_RING_HITS, LOOSE_RING) + struck(HELD_RING_HITS, HELD_RING)
    rings = rings + struck(RESTING_RING_HITS, RESTING_RING)
    plastic = struck(LAYER_SLAPS, LAYER_PARTIALS) + struck(CASE_KNOCKS, CASE_PARTIALS)
    disc = struck(DISC_WHACKS, DISC_PARTIALS)
    near = thumps() + drops() + rims + rings + plastic + disc + rolling() + cord()
    near = near * np.where(t < CUT + FADE, np.clip((CUT - t) / FADE, 0, 1), 1)

    side = np.array([[1], [-1]])

    def ports(hz):
        return to_linear_factor(side * along(PORT_BALANCE, hz) / 2) * np.exp(-1j * np.pi * hz * side * LAG)

    direct = filtered(near * to_linear_factor(side * SCENE_PAN_DB / 2 * (t > CUT)), ports)
    return direct + room(near[0]) + background()


def band_limit(x):
    return signal.sosfilt(signal.butter(12, 16970, fs=SR, output="sos"), x)


def record(dry):
    held = dry / (1 + np.abs(dry) ** 8) ** (1 / 8)
    mix = filtered(held, lambda hz: np.clip((15850 - hz) / 200, 0, 1) ** 2)
    return band_limit(mix)


dry = scene()
out = record(dry)
dump_mix(out)
```